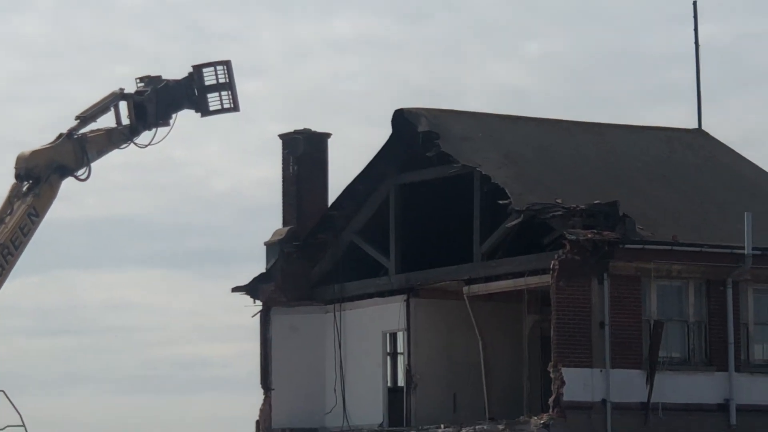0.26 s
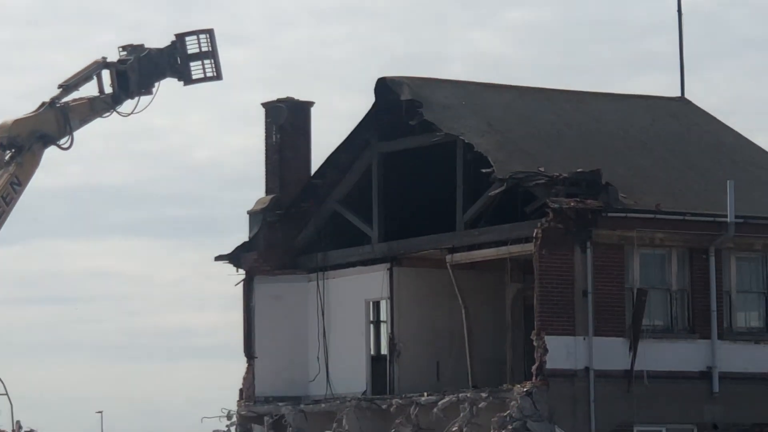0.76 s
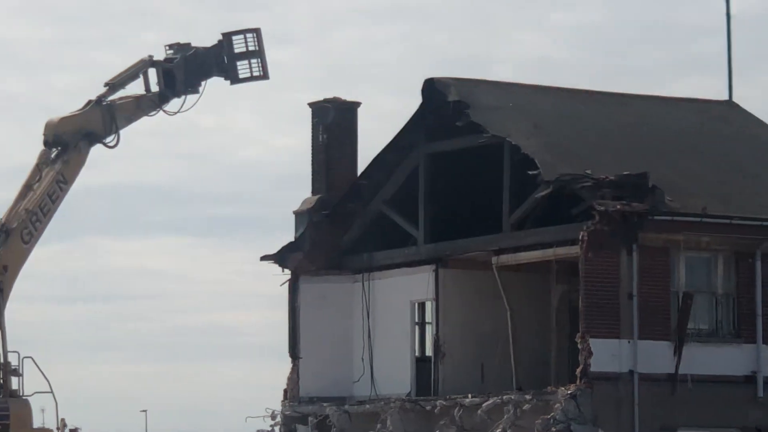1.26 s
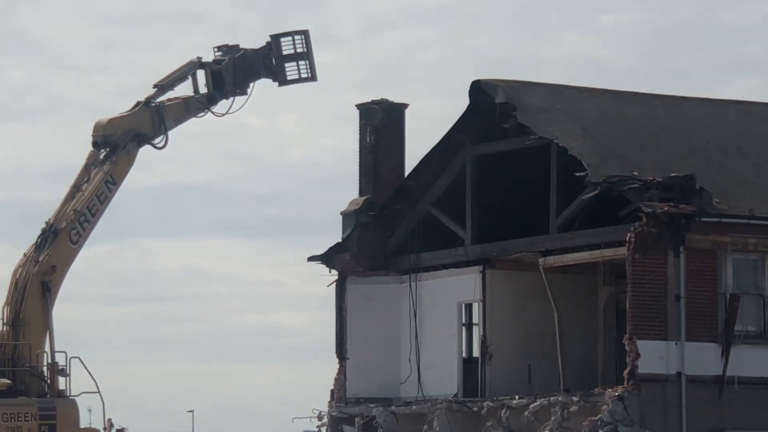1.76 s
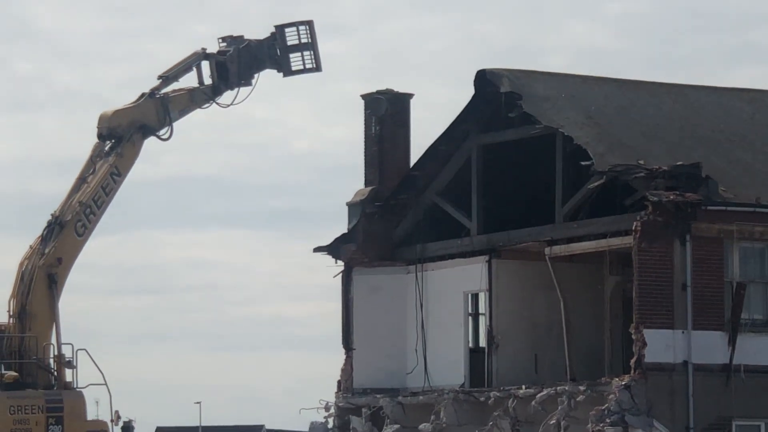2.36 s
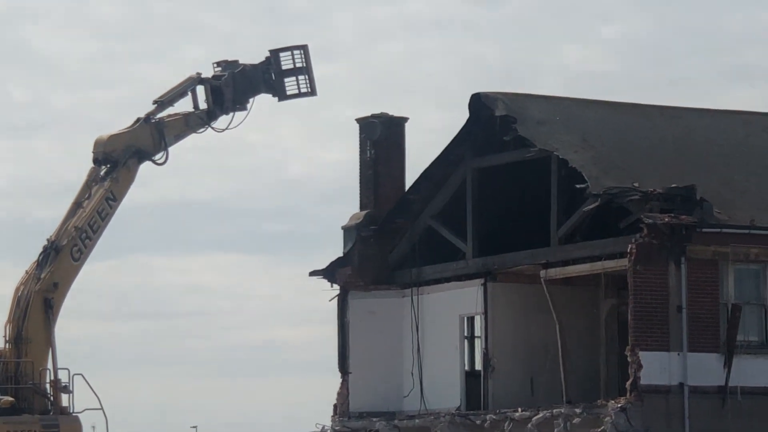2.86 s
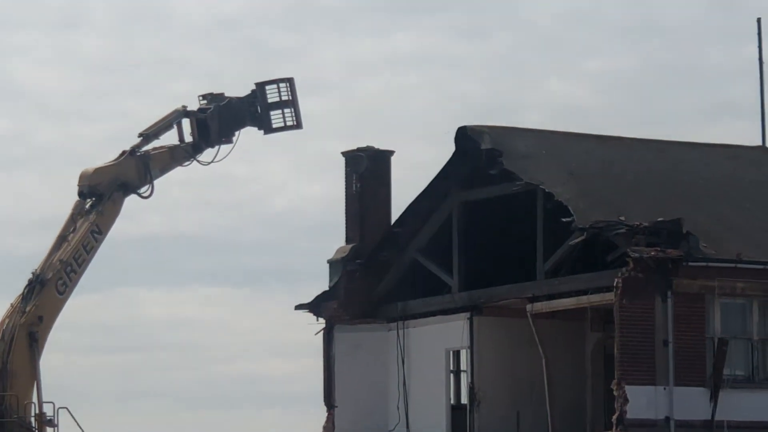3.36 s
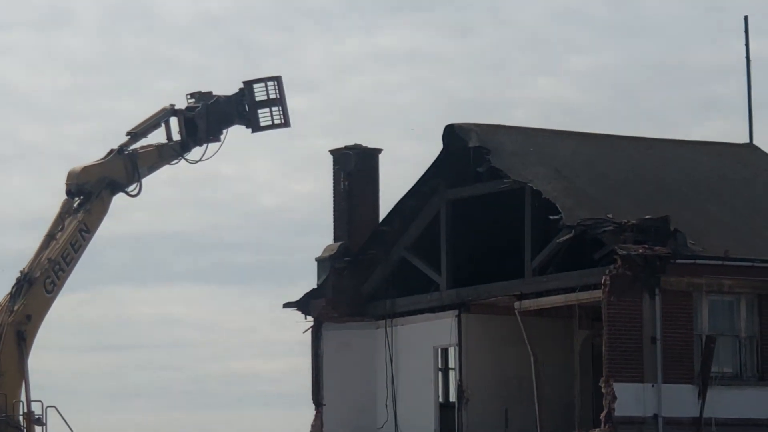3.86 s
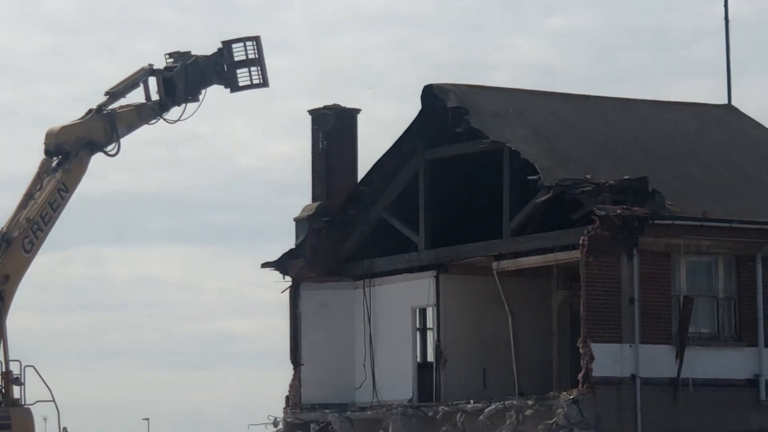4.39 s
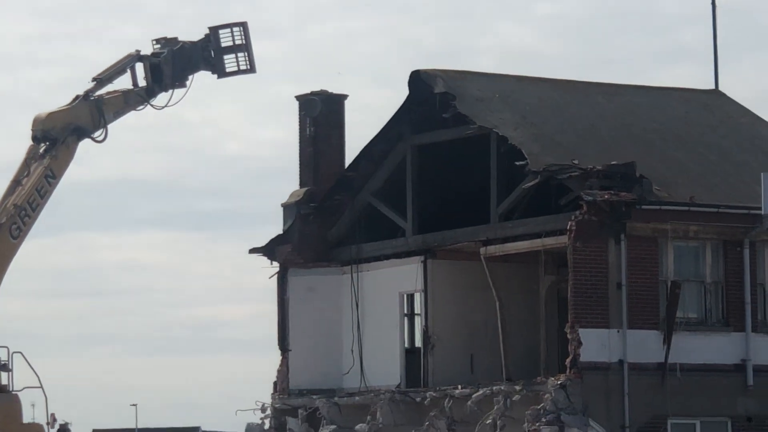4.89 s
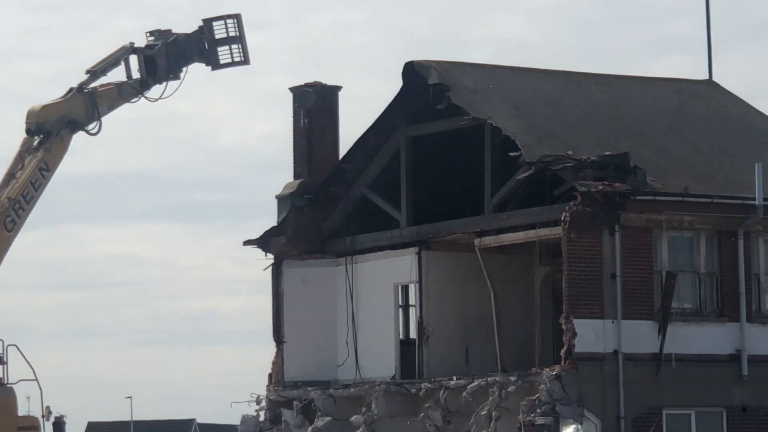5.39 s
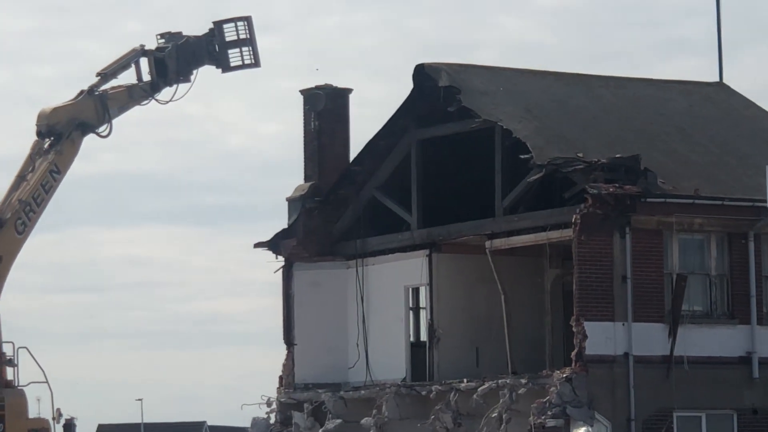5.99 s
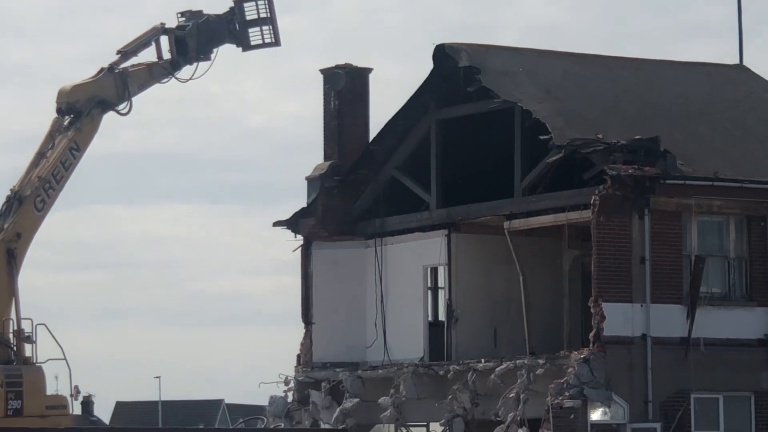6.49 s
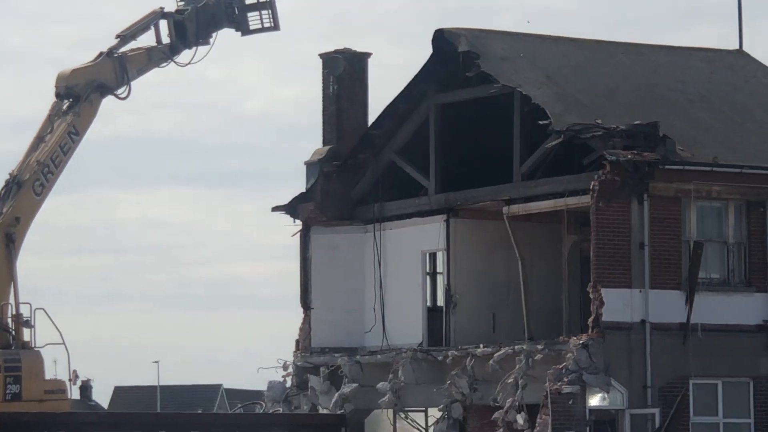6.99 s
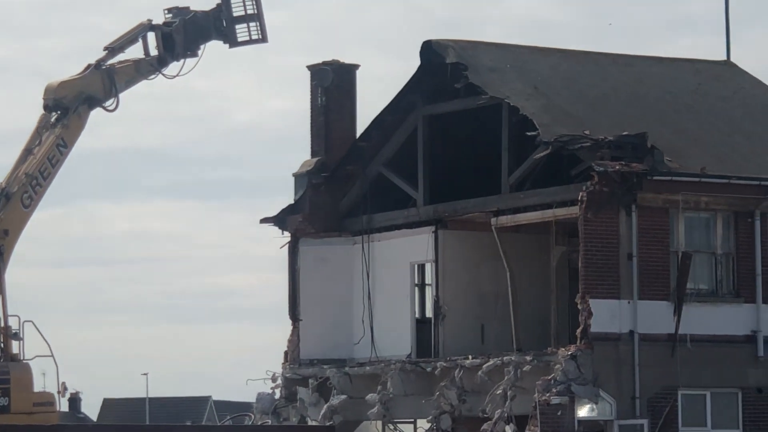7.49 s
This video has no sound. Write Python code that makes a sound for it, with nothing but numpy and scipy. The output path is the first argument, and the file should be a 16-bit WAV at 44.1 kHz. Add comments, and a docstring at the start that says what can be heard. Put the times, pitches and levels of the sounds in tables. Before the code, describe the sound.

Handling noise dominates: hard, hollow, woody-plastic knocks ringing in the middle range, each sweeping down into a dull thump, with gritty rubbing and brief squeaks. They come in a busy early cluster, then sparsely. Behind them a distant diesel machine rumbles steadily and faintly with slight clatter and hiss. Late on come a faint thin squeal and a small sizzle. Dry, close microphone, outdoors.

```python
"""A faint, even diesel rumble and hiss run throughout: an excavator works some way off on a demolition site.
Sharp hollow knocks sound over it from the very start, many dragging into a rub, as the microphone's
housing is handled. Each knock is the impulse response of that housing, which rings near 720 Hz and is
dispersive: treble arrives before bass, so a knock sweeps down into a thump. Rubs are dense random slips
through a similar response. Soft bumps, short squeaks, and late on a faint squeal and a thin sizzle join in."""
import sys
import numpy as np
from scipy import signal
from scipy.fft import rfft, irfft
from scipy.io import wavfile
from scipy.ndimage import uniform_filter1d, minimum_filter1d

SR = 44100
rng = np.random.default_rng(int(sys.argv[2]) if len(sys.argv) > 2 else 0)


def dump_mix(stems):
    """Bounce the given channels to the path in sys.argv[1] as a 16-bit WAV at rate SR."""
    frames = np.atleast_2d(stems).T  # one column per channel
    limited = np.clip(frames, -1, 1)  # hard clip at full scale
    pcm = np.round(limited * 32767).astype(np.int16)
    wavfile.write(sys.argv[1], SR, pcm)


N = 341334
T = np.arange(N) / SR
TAPS = 8192
BINS = np.fft.rfftfreq(TAPS, 1 / SR)  # frequencies of the housing's response, Hz


def amp(db):
    """Level in decibels to amplitude ratio: 20 dB per factor of ten."""
    return 10 ** (np.asarray(db) / 20)


def unit(x):
    """Scales to unit rms, so that a later gain sets the effective level."""
    return x / np.sqrt(np.mean(x ** 2) + 1e-20)


def read(points, hz):
    """Interpolates a spectrum along a logarithmic frequency axis, as hearing spaces pitch."""
    f, values = np.transpose(points)
    return np.interp(np.log(hz + 1), np.log(f + 1), values)


def add(mix, s, sound):
    """Superposition: adds a sound to the mix from time s, in seconds."""
    part = mix[max(round(s * SR), 0):][:len(sound)]
    part += sound[:len(part)]


def coloured(x, points):
    """Linear filtering: multiplies the spectrum by a gain curve, then scales to rms 1."""
    gain = amp(read(points, np.fft.rfftfreq(N, 1 / SR)))
    return unit(irfft(rfft(x) * gain, N))


def band(x, lo_hz, hi_hz):
    """Band-pass filtering with steep tenth-order skirts, then scaling to rms 1."""
    hz = np.fft.rfftfreq(N, 1 / SR) + 1
    loss = np.sqrt((1 + (lo_hz / hz) ** 20) * (1 + (hz / hi_hz) ** 20))
    return unit(irfft(rfft(x) / loss, N))


def wander(rate_hz):
    """Slow random motion: white noise low-passed at rate_hz, rms 1."""
    return band(rng.standard_normal(N), 0, rate_hz)


def excavator(rumble_db=-56.0, firing_hz=90.0, firing_db=-70, clatter_db=-77.0, tick_share=.12, rasp_db=-13):
    """Periodic combustion: broadband rumble, a firing tone, and a tick with a rasp every third firing."""
    # engine and fan spectrum (f/Hz, density level/dB per Hz)
    engine_tone = [(25, -31.5), (38, 6), (50, -8), (84, 0.5), (130, -6), (200, -11.5), (300, -20),
                   (520, -19.5), (830, -19), (1050, -24), (1500, -27.5), (2100, -40), (4000, -58.5)]
    firings = np.cumsum(firing_hz * (1 + .003 * wander(3))) / SR  # running count
    rumble = coloured(rng.standard_normal(N), engine_tone)
    cycle = (firings / 3) % 1  # 0-1 between ticks
    ticks = unit(1. * (np.diff(cycle, prepend=0) < 0))
    rasp = unit(np.exp(-cycle / tick_share) * rng.standard_normal(N))
    clatter_tone = [(500, -25), (950, -6), (1500, 0), (2000, -11), (4000, -28), (9000, -50)]
    clatter = coloured(ticks + amp(rasp_db) * rasp, clatter_tone)
    firing_note = np.sin(2 * np.pi * firings)
    return amp(rumble_db) * rumble + amp(clatter_db) * clatter + amp(firing_db) * firing_note


def hiss(level_db=-73.0):
    """Stationary random noise: the microphone's own hiss, weaker toward high frequencies."""
    # microphone hiss spectrum (f/Hz, density level/dB per Hz)
    hiss_tone = [(100, 9.5), (2000, 0.5), (4500, -1.5), (8000, -6.5), (12000, -10.5), (15500, -17.5)]
    return amp(level_db) * coloured(rng.standard_normal(N), hiss_tone)


def housing(tone, lag_turns, knee_hz=12):
    """Impulse response of a dispersive resonator: minimum phase of tone (dB per bin), lag, echoes, modes."""
    # long modes (f/Hz, t60/s, peak level re direct path/dB)
    modes = [(245, .13, -9), (494, 0.27, -6)]
    # internal reflections (delay t/s, level re direct path/dB)
    echoes = [(.0058, -33.5), (0.0162, -30.5)]
    log_gain = np.log(amp(tone))
    # a causal response ties phase to log gain through the Hilbert transform
    phase = -signal.hilbert(np.r_[log_gain, log_gain[-2:0:-1]]).imag[:len(BINS)]
    # well above knee_hz, every frequency is late by about lag_turns of its own cycles
    phase = phase - 2 * np.pi * lag_turns * np.log(1 + BINS / knee_hz)
    paths = 1 + sum(amp(db) * np.exp(-2j * np.pi * BINS * s) for s, db in echoes)
    for f, t60, db in modes:
        decay_s = t60 / np.log(1000)
        paths = paths + amp(db) / (1 + 2j * np.pi * (BINS - f) * decay_s)
    return irfft(np.exp(log_gain + 1j * phase) * paths)[:TAPS // 2]


def knocks(lag_turns=1.45, uneven_db=5.0, contact_hz=3900, snap=0.43, briefest_hz=6500,
           thump_db=-0.42, thump_light=.4, thump_hard=0.28, deep_share=1.4, deep_db=-4.0, clack_share=0.7584):
    """Impact excitation: a harder, briefer contact has a wider spectrum; the housing rings and disperses it."""
    # hard contacts (t/s, level before own colouring/dB, hardness as treble/dB, ring f/Hz)
    blows = [(0.028, -34, 21, 790), (0.064, -30, 21.5, 740), (0.098, -34.5, 23, 700),
             (0.1067, -26.5, 9, 737), (0.1314, -24, 9.5, 740), (0.3563, -12.5, -4.5, 730),
             (0.578, -35, -16, 540), (0.6076, -29.5, -23, 720), (0.748, -1, 2, 735),
             (0.9297, -3.5, 5.5, 667), (1.089, -11, 2, 590), (1.1075, -1.5, 21, 765),
             (1.207, -29, 17.5, 664), (1.7453, -23, 15, 634), (2.603, -44.5, 3, 600),
             (3.0112, -7, 7.5, 773), (3.031, -22.5, 1.5, 714), (3.117, -27.5, -6, 587.4),
             (4.259, 1.5, -1.5, 739), (4.9121, -5, 0.5, 752), (5.22, -44.5, 21, 720), (7.07, -1, -4.5, 722),
             (7.3192, -4, -7, 726), (6.719, -59, -2, 625), (7.467, -35, 9.5, 640)]
    # knock through the housing, ringing at 720 Hz (f/Hz, density level/dB per Hz)
    knock_tone = [(25, -41), (60, -14.5), (130, -10), (330, -13), (450, -15.5), (600, -1.5), (770, 0.5),
                  (880, -8.5), (1050, -18), (1250, -22), (1550, -25.5), (2700, -41), (4100, -57),
                  (11000, -74.5)]
    out = np.zeros(N)
    full = abs(housing(read(knock_tone, BINS), lag_turns)).max()
    spots_hz = np.geomspace(100, 8000, 40)
    # how uneven each part of the spectrum is, as a share of uneven_db
    uneven_share = read([(350, 0.68), (600, 0.067), (850, 0.36), (1300, 1)], BINS)
    for s, db, treble_db, ring_hz in blows:
        bass_db = thump_db - thump_light * db + thump_hard * treble_db  # a light knock is mostly thump
        colour = [(90, deep_share * bass_db + deep_db), (260, bass_db), (450, 0.0032), (850, 0.0058),
                  (1300, clack_share * treble_db), (3000, treble_db)]
        # each knock has its own peaks and dips
        spot = np.interp(BINS, spots_hz, rng.standard_normal(len(spots_hz))) * uneven_share
        top_hz = min(contact_hz * amp(snap * (db + treble_db)), briefest_hz)
        contact_db = -10 * np.log10(1 + (BINS / top_hz) ** 6)
        ring_tone = read(knock_tone, BINS * 720 / ring_hz)  # shifted to this knock's ring
        tone = ring_tone + read(colour, BINS) + uneven_db * spot + contact_db
        add(out, s, amp(db) / full * housing(np.maximum(tone, -100), lag_turns))
    return out


def slides(edge_s=.004, arch_db=7.5):
    """Sliding friction: yields grip 0-1, level dB, hardness dB and pressure change dB of each contact."""
    # drags that skid on and let go (start t/s, end t/s, first nominal level/dB,
    # hardness as treble/dB, fade/dB per s)
    drags = [(0.035, 0.104, -54, -3, 2), (0.749, 0.81, -31, -11.5, 102.5), (0.811, 0.925, -37, -19.5, 29),
             (0.94, 0.977, -33, -12.5, 451), (1.107, 1.57, -40.5, 4, 61), (1.757, 1.885, -46, -6.5, 149),
             (3.02, 3.153, -37, -27, 121.5), (3.19, 3.335, -47, -19, 88.5), (4.273, 4.334, -36, -10.5, 25),
             (4.915, 5.815, -44, -7.5, 30.5), (5.209, 5.818, -52, -9, 16),
             (7.079, 7.186, -39.5, -13.5, 104.5), (7.321, 7.475, -30.5, -11.5, 53)]
    # strokes that swell and ebb (start t/s, end t/s, nominal mid level/dB, hardness as treble/dB)
    strokes = [(0.12, 0.151, -40.5, -5), (0.268, 0.302, -43.5, -24), (0.364, 0.388, -43, -20),
               (0.387, 0.505, -32.5, -28), (0.653, 0.702, -39.5, -33), (0.721, 0.75, -38.5, -25),
               (0.977, 1.132, -34, -27), (1.344, 1.587, -46, -13.5), (1.566, 1.661, -41, -16.5),
               (1.638, 1.727, -53, -11.5), (1.716, 1.764, -27, -22.5), (1.899, 1.956, -51.5, -7),
               (1.947, 2.186, -40.5, -15.5), (4.235, 4.251, -52, -18), (5.166, 5.242, -52.5, -14)]

    def grip(start, end):
        """Equal-power onset and release of the contact."""
        return np.sqrt(np.clip(np.minimum(T - start, end - T) / edge_s + .5, 0, 1))

    for start, end, db, treble_db, fade_db_per_s in drags:
        yield grip(start, end), db, treble_db, -fade_db_per_s * (T - start)
    for start, end, db, treble_db in strokes:
        from_middle = 2 * (T - start) / (end - start) - 1  # -1 to 1
        yield grip(start, end), db, treble_db, -arch_db * from_middle ** 2


def rubs(slips_per_s=2000, spread_db=2.0, flutter_db=1.67, treble_fade=1.5, bright_db=-11,
         rumble_base_db=-46, rumble_press=.62, rumble_hard=0.46, middling_db=-46.0,
         lower_db=-8.5, soft_share=0.22, middle_db=-8.5, upper_db=-8.0, upper_share=.35,
         high_db=-2.5, top_db=-9, top_share=0.16):
    """Random stick-slip excitation: dense slips of uneven size drive the housing while a contact slides."""
    # rubbing through the housing (f/Hz, density level/dB per Hz)
    rub_tone = [(25, -32), (65, -0.5), (140, 4), (250, -2.5), (390, -5), (530, -1.5), (680, -2), (810, -4),
                (1000, -13), (1200, -11.5), (1500, -13), (1850, -22.5), (3000, -31.5), (3900, -49)]
    # panel resonances brought out by rubbing (f/Hz, width/Hz, boost/dB)
    rub_peaks = [(562, 37, 1.5), (802, 45, 5), (1243.5, 20, 3), (1486, 350, 12), (1768, 36, 2.5),
                 (1961, 31, 6)]
    sizes = amp(spread_db * np.minimum(rng.exponential(1, N), 4)) * rng.choice([-1, 1], N)
    slips = sizes * (rng.random(N) < slips_per_s / SR) * amp(flutter_db * wander(27))
    peaks_db = sum(db / (1 + (2 * (BINS - hz) / width) ** 2) for hz, width, db in rub_peaks)
    sound = signal.oaconvolve(slips, housing(read(rub_tone, BINS) + peaks_db, lag_turns=1.4))[:N]
    edges_hz = [0, 360, 520, 720, 1080, 1900, 3200]
    bands = [band(sound, lo, hi) for lo, hi in zip(edges_hz[:-1], edges_hz[1:])]
    low, lower, middle, upper, high, top = bands
    out = np.zeros(N)
    for grip, db, treble_db, pressure_db in slides():
        at = grip > 0
        swell = pressure_db[at]
        press_db = db + swell
        hardness = treble_db - bright_db  # dB; tilts the balance of the bands
        rumble_db = rumble_base_db + rumble_press * (press_db - middling_db) + rumble_hard * hardness
        # a soft contact also loses some of the band just above the rumble
        body_db = lower_db + soft_share * min(hardness, 0) + (rumble_db + press_db) / 2
        rumble = low[at] * amp(rumble_db) + lower[at] * amp(body_db)
        ring = amp(middle_db) * middle[at] + amp(upper_db + upper_share * hardness) * upper[at]
        rasp = amp(high_db) * high[at] + amp(top_db + top_share * hardness) * top[at]
        rasp_db = db + treble_db + treble_fade * swell
        out[at] += grip[at] * (rumble + ring * amp(press_db) + rasp * amp(rasp_db))
    return out


def bumps(lag_turns=1.8):
    """Long, soft contact: chiefly bass is excited, and dispersion makes it glide down."""
    # soft contacts, and the deep thump under two hard knocks at 1.107 and 3.011 s (t/s, peak level/dB, centre
    # f/Hz)
    contacts = [(0.066, -39, 105), (0.506, -34.5, 124), (0.608, -25, 100), (1.107, -20.5, 80),
                (1.206, -27.5, 75), (2.606, -50, 100), (2.841, -44, 100), (3.011, -26.5, 110),
                (3.138, -37.5, 100), (7.468, -41, 105)]
    # soft bump through the housing (f as a multiple of its centre, density level/dB per Hz)
    bump_tone = [(.2, -33), (.55, -5), (1, 2.5), (1.5, -3.5), (2.3, -18), (4, -31), (8, -36), (16, -43.5),
                 (40, -81.5)]
    out = np.zeros(N)
    for s, db, centre_hz in contacts:
        points = [(multiple * centre_hz, gain) for multiple, gain in bump_tone]
        bump = housing(read(points, BINS), lag_turns)
        add(out, s, amp(db) * bump / abs(bump).max())
    return out


def squeaks(waver=0.015):
    """Stick-slip locked to a resonance: a sine under a half-sine swell, gliding and wavering in pitch."""
    # short squeaks (start t/s, length t/s, f/Hz, pitch change as a share of f, peak level/dB)
    locked_slips = [(0.127, 0.032, 678, -0.079, -23.5), (1.034, 0.064, 601.7, -.12, -34.5),
                    (1.575, 0.062, 641, -0.13, -36.5), (3.045, 0.017, 611, 0.068, -32)]
    out, drift = np.zeros(N), wander(90)
    for s, length, hz, glide, db in locked_slips:
        u = np.linspace(0, 1, int(length * SR))
        pitch = hz * (1 + glide * (u - .5) + waver * drift[int(s * SR):][:len(u)])
        add(out, s, amp(db) * np.sin(np.pi * u) * np.sin(2 * np.pi * np.cumsum(pitch) / SR))
    return out


def squeal(hz=1345, rise=0.0097, db=-75, octave_db=-70, octave_s=0.14):
    """Two harmonics, as of a dry pivot: the pitch creeps up while the octave decays exponentially."""
    start, end = 6.955, 7.3  # s
    out, t = np.zeros(N), np.arange(0, end - start, 1 / SR)
    phase = 2 * np.pi * np.cumsum(hz * (1 + rise * t / t[-1])) / SR
    octave = amp(octave_db) * np.exp(-t / octave_s) * np.sin(2 * phase)
    tone = amp(db) * np.sin(phase) + octave
    add(out, start, signal.windows.tukey(len(t), .08) * tone)
    return out


def scuff(middle_s=7.347, width_s=0.036, db=-73):
    """Narrow-band friction noise near 5 kHz under a Gaussian envelope: a thin sizzle over a late rub."""
    sizzle = coloured(rng.standard_normal(N), [(4300, -39), (4950, 4), (5550, -2.5), (6300, -36.0)])
    return amp(db) * np.exp(-((T - middle_s) / width_s) ** 2) * sizzle


def scene():
    """Linear superposition of the far machine, the microphone's hiss and the handling close by."""
    far = excavator() + squeal()
    handling = knocks() + rubs() + bumps() + squeaks() + scuff()
    return (far + hiss() + handling)[None]


def record(dry, edge_hz=15750):
    """Dynamic range and bandwidth: a quick limiter holds peaks under full scale, then a low-pass."""
    room = np.minimum(1, .93 / (abs(dry[0]) + 1e-9))  # gain that each sample allows
    held = minimum_filter1d(room, size=129)
    gain = uniform_filter1d(uniform_filter1d(held, size=65), size=65)
    lowpass = signal.firwin(511, edge_hz, window=("kaiser", 9), fs=SR)
    return signal.oaconvolve(dry * gain, lowpass[None], "same")


dry = scene()
out = record(dry)
dump_mix(out)
```